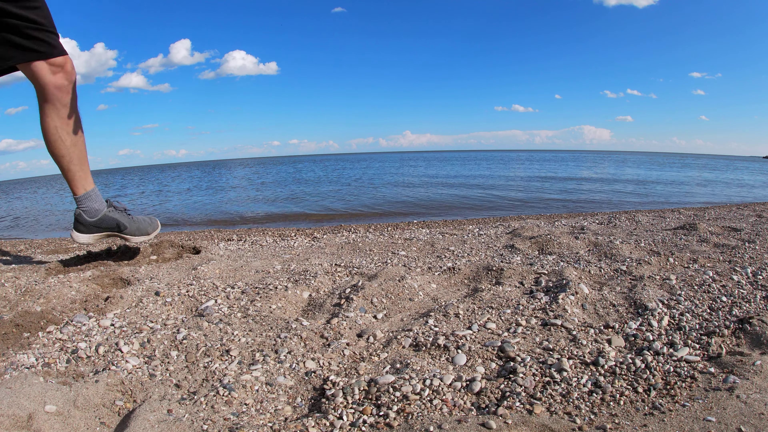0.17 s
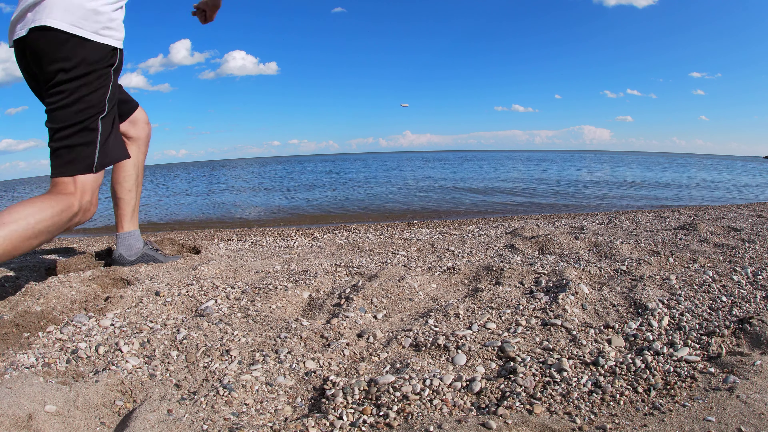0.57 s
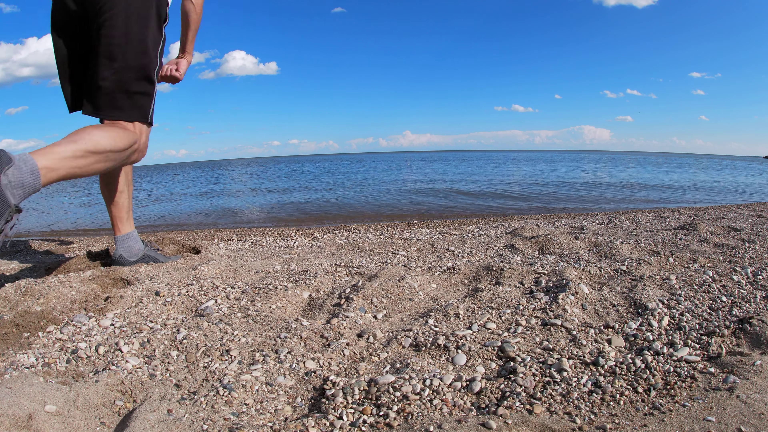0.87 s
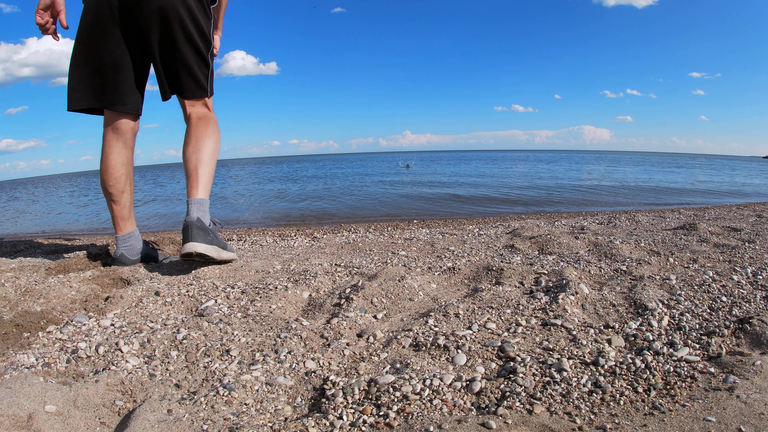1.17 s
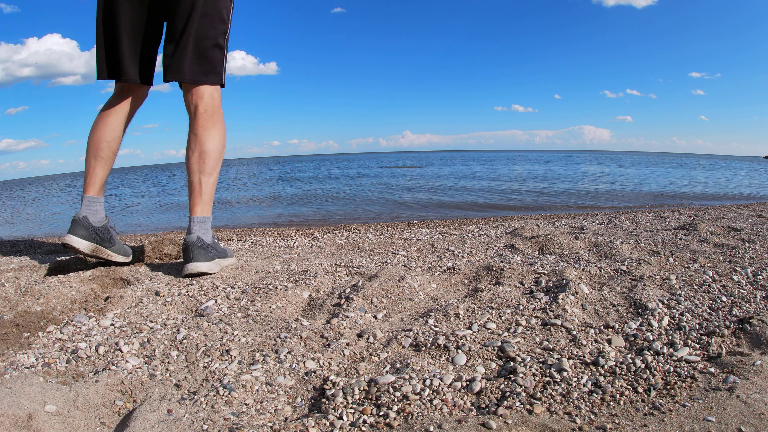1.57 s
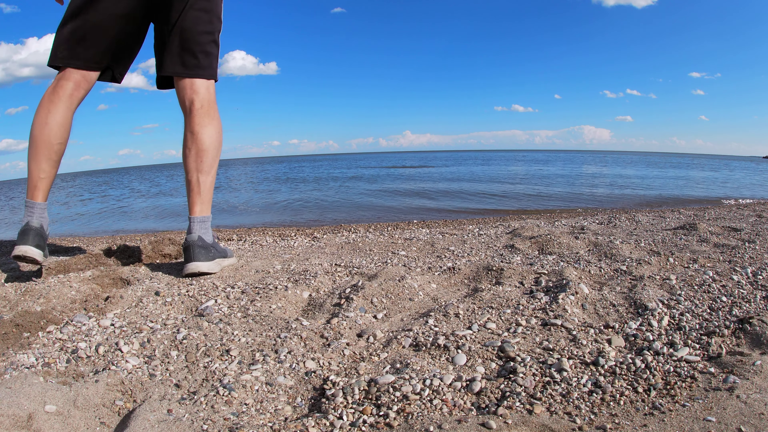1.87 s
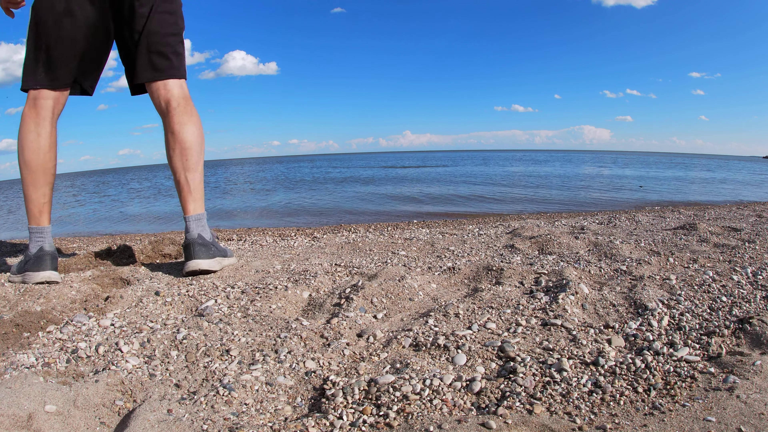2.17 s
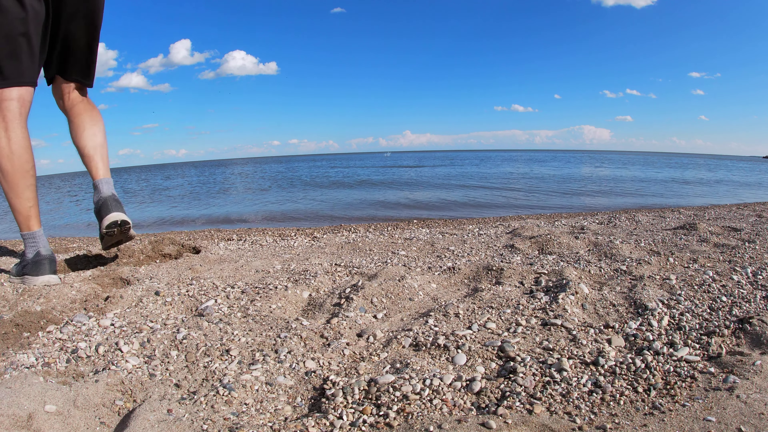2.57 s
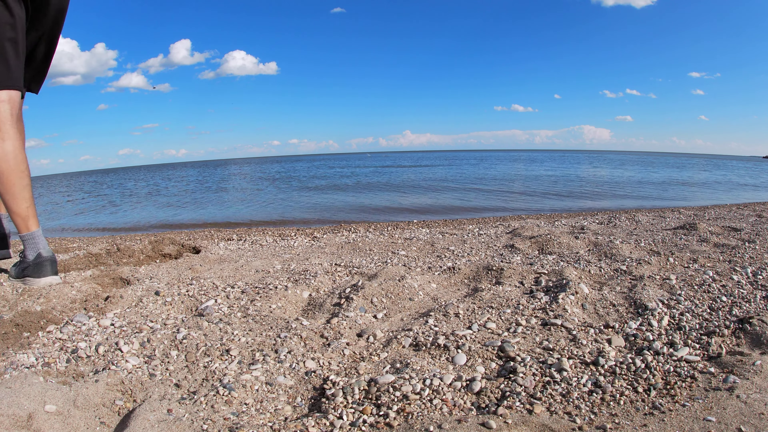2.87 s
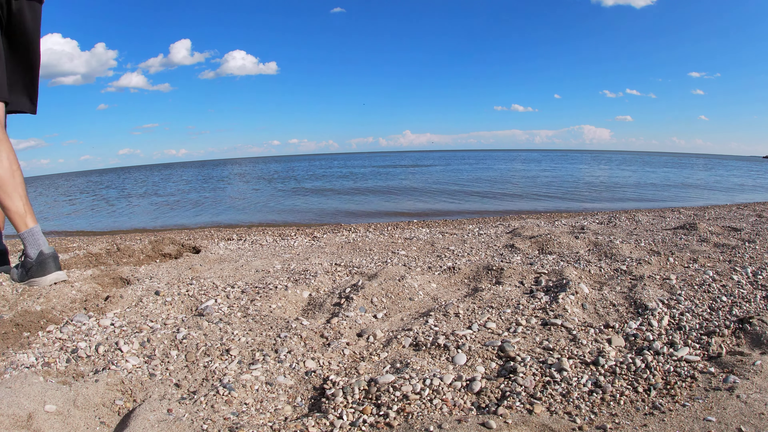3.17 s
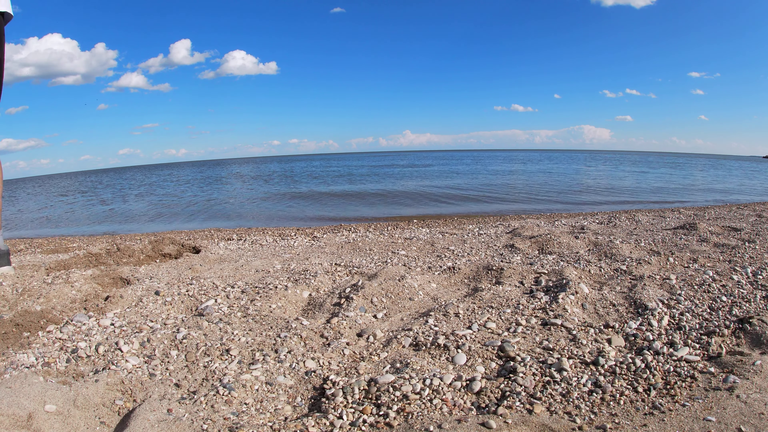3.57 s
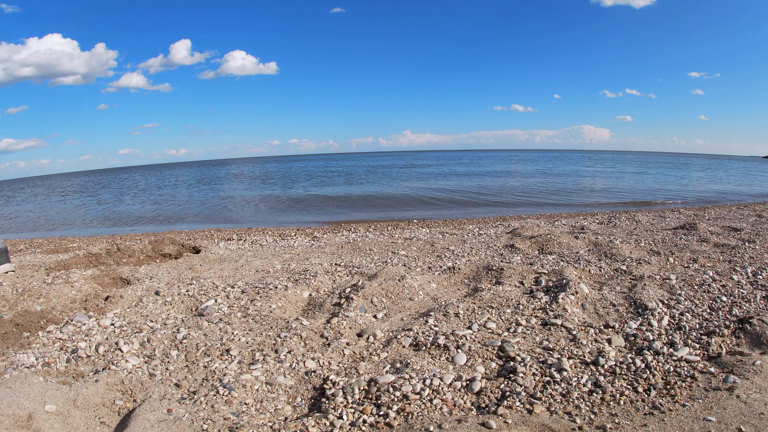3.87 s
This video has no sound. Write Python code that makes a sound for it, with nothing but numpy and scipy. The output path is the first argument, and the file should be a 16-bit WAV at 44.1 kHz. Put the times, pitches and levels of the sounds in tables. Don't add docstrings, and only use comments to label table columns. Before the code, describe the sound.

Shoes crunch close by on pebbles and shell grit, stones clicking; then strong gusts rumble and thump on a small ground-level microphone, and a small wave washes in near the end.

```python
import sys
import numpy as np
from scipy import signal
from scipy.fft import rfft, irfft, next_fast_len
from scipy.io import wavfile
from scipy.ndimage import uniform_filter1d, map_coordinates

SR = 44100
rng = np.random.default_rng(int(sys.argv[2]) if len(sys.argv) > 2 else 0)


def file_out(sig):
    cols = np.atleast_2d(sig).T
    lim = np.clip(cols, -1, 1)
    pcm = np.round(lim * 32767).astype(np.int16)
    wavfile.write(sys.argv[1], SR, pcm)


def linear_from_db(decibels):
    return 10 ** (np.asarray(decibels, float) / 20)


N = 176400

# time in seconds, strength in dB, air speed as a ratio.
WIND_COURSE = [(0, -46, 1.41), (.25, -64, 1.04), (.55, -44.5, 1.09), (.68, -27.5, 1.22), (.9, -47, 0.99),
               (1.35, -40, 1.26), (1.5, -19, 1.275), (1.72, -24, 1.234), (1.87, -24, 1.566),
               (1.99, -34.5, 1.07), (2.07, -21.5, 1.17), (2.3, -19, 2.7), (2.43, -24, 1.8),
               (2.52, -20.5, 2.03), (2.57, -35.5, 1.36), (3.2, -27.5, 1.68), (3.62, -36, 1.226),
               (4, -27.5, 1.18)]
# peak in seconds, level in dB, air speed as a ratio,
# half length in seconds.
WIND_BURSTS = [(0.664, -27.5, 1.2, 0.011), (0.684, -19, 1.83, 0.01715), (0.714, -24.5, 1.93, 0.01412),
               (0.802, -33, 1.25, 0.0078), (1.067, -32.5, 1.38, 0.0075), (1.209, -35, 1.3, 0.0085),
               (1.522, -17, 2.27, 0.01532), (1.583, -15, 3.29, 0.01107), (2.392, -19, 4.78, 0.005886),
               (1.65, -19, 3.21, 0.005004), (1.809, -24, 6.63, 0.00293), (1.853, -24, 3.59, 0.0058),
               (1.872, -21.5, 3.07, 0.0035), (1.921, -22.5, 3.95, 0.00669), (1.956, -24.5, 3.18, 0.00506),
               (2.025, -22, 2.59, 0.007084), (2.068, -19.5, 2.766, 0.007), (2.204, -16, 4.16, 0.012067),
               (2.231, -17.5, 6.2, 0.004495), (2.25, -10.5, 4.5, 0.00643), (2.278, -15, 4.87, 0.00597),
               (2.307, -13.5, 5.33, 0.00771), (2.361, -17.5, 2.6, .025), (2.47, -16, 3.29, 0.00766),
               (2.491, -16, 6.12, .012), (3.148, -22, 2.07, 0.01545), (3.21, -21, 1.96, 0.014),
               (3.246, -22, 2.6, 0.01462), (3.48, -19.5, 2.29, 0.014), (3.752, -20, 1.37, 0.019),
               (1.75, -22.5, 2.415, 0.0059), (1.785, -21, 2.89, 0.00988), (2.122, -24, 3.072, .01),
               (2.148, -20.5, 3.387, 0.0083), (2.327, -20, 4.54, 0.00673), (2.42, -20.5, 2.86, 0.0074),
               (2.515, -17.5, 3.01, 0.00805), (2.586, -33.5, 2.5, 0.01604), (2.742, -28.5, 2.25, 0.01212),
               (3.351, -26, 3.06, 0.00987), (3.601, -27.5, 2.43, 0.01496), (3.927, -28.5, 2, 0.021)]
# frequency in Hz, level in dB.
EDDY_COLOUR = [(12, -10.5), (25, -0.5), (50, -4.5), (85, -7), (130, -17.5), (200, -29.5), (350, -47),
               (900, -110)]
# peak in seconds, peak level in dB, pitch in Hz.
MEMBRANE_SNAPS = [(1.808, -18, 444), (1.879, -21, 258), (2.247, -5.5, 230), (2.286, -14.5, 360),
                  (2.308, -11, 400), (2.391, -22, 390), (2.488, -23.5, 590), (2.234, -18.5, 440),
                  (2.213, -12.5, 270), (.687, -13.5, 110), (2.471, -15.5, 235), (1.7, -17, 170),
                  (1.612, -10, 116), (2.352, -14.5, 160), (2.38, -19, 220), (1.812, -18.5, 157)]
# crest in seconds, level in dB, rise in seconds, drain in seconds.
WAVE_CRESTS = [
    (3.17, -37.5, 0.18, 0.19),
    (2.905, -52, 0.13, 0.13),
    (3.75, -48.5, 0.031, 0.021),
    (3.9, -51, 0.084, 0.068),
    (3.48, -43, 0.074, 0.05),
    (3.62, -51, 0.034, 0.071),
    (3.6, -55, 0.039, 0.017),
    (4.02, -38, 0.077, .1),
    (2.24, -48.5, 0.12, 0.35),
]
# frequency in Hz, level in dB.
WASH_COLOUR = [(150, -6.5), (350, 2.5), (700, -3), (1300, -16), (2400, -28.5), (5000, -40.5), (6300, -44),
               (8000, -66.5)]
# frequency in Hz, level in dB.
LAPPING_COLOUR = [(200, 2.5), (1250, -8.5), (3400, -15.5), (5050, -15), (5750, -12.5), (6900, -24.5),
                  (13000, -44), (14000, -61.5)]
# peak in seconds, peak level in dB, fall in seconds.
PEBBLE_SLIPS = [(0.028, -46.5, 0.0078), (0.068, -40.5, 0.0043), (0.087, -38, 0.0055), (0.12, -38.5, 0.0038),
                (0.145, -33, 0.0045), (0.156, -30, 0.0095), (0.219, -35, 0.0033), (0.237, -34, 0.0053),
                (0.318, -36, 0.0061), (0.361, -34, 0.0045), (0.442, -26, 0.0045), (0.464, -25.5, 0.005),
                (0.478, -28, 0.0081), (0.52, -33, 0.0047), (0.534, -33, 0.005), (0.58, -30, 0.0055),
                (0.622, -31, 0.0066), (0.654, -31, 0.0058), (3.031, -37, 0.0042), (3.076, -39.5, 0.005),
                (3.201, -34, 0.0079), (3.47, -42, 0.0052), (3.593, -51, 0.0037), (3.663, -53, 0.0027)]
# peak in seconds, level in dB, rise in seconds, fall in seconds, brightness
# in dB (each dB lifts the bright grit by 1 dB and lowers the dull grit by 2.54 dB).
SHOE_LOADS = [(0.162, -51, 0.041, 0.047, -2.5), (.1, -60.5, 0.018, 0.022, -3),
              (.24, -60, 0.059, 0.031, -0.5), (.3, -61, 0.19, 0.28, -1.5), (0.436, -44.5, 0.027, 0.021, 1),
              (.472, -38.5, 0.024, 0.024, .5), (0.532, -46, 0.032, 0.02, -2.5),
              (.6, -48.5, 0.047, 0.053, 2), (0.647, -45.5, 0.046, 0.023, -0.5),
              (0.694, -52.5, 0.051, 0.013, -1), (0.801, -52, 0.046, 0.1, 4), (0.87, -53, 0.028, 0.01, -1),
              (1.069, -41, 0.0031, 0.0068, 4.5), (1.3, -38, 0.0082, 0.014, 0.5),
              (1.4, -52.5, 0.12, 0.12, 5), (2.145, -66, 0.02, 0.057, 12), (2.222, -59, 0.023, .025, 9),
              (3.039, -62.5, 0.1, 0.047, -2.5), (3.24, -57.5, 0.041, 0.13, -4),
              (3.421, -51.5, 0.047, 0.046, 3.5), (3.979, -52, 0.044, 0.06, 1)]
# frequency in Hz, level in dB per Hz.
GRIT_COLOUR = [(90, -41.5), (160, -5.5), (620, -3), (1450, -9), (3000, -14.5), (6000, -20.5),
               (10500, -40.5), (15000, -67.5)]
# knock in seconds, peak level in dB, pitch in Hz, ring in cycles.
STONE_KNOCKS = [(0.088, -34, 2120, 0.94), (0.244, -40, 5030, 2.2), (0.358, -44, 1640, 2.7),
                (0.926, -43, 7550, 1.4), (0.9896, -43.5, 5736, 2), (1.0665, -23, 6500, 0.6),
                (1.2948, -42, 2007, 0.76), (1.4182, -40, 4200, 4.43), (1.4406, -45, 3434, 4),
                (1.468, -48.5, 2490, 8.8), (1.485, -44, 2740, 3), (1.494, -49.5, 3380, 8.2),
                (1.527, -51, 7543, 3.5), (1.545, -50, 4870, 5.1), (1.875, -50, 3774, 1.8),
                (1.9345, -58, 2918, 9.5), (1.98, -57, 5970, 2.7), (2.1001, -55, 4198, 3.1),
                (2.1221, -57, 4952, 1.285), (2.3615, -52.5, 5610, 2.5), (2.4354, -58, 5500, 4.8),
                (3.7811, -55, 3048, 1.27), (3.797, -43, 4940, 1), (3.855, -54, 4000, 5)]
# start in seconds, level in dB, first pitch in Hz, pitch rise in Hz per second,
# half length in seconds.
HOLLOW_GURGLE = (1.692, -53, 600, 12000, .011)
# peak in seconds, level in dB, rise in seconds, fall in seconds.
GRIT_SIFTS = [
    (1.62, -73.5, 0.57, 0.51),
    (2.159, -68, 0.047, 0.11),
]

LOW_CUT_HZ, MIC_HZ, HISS_DB = 22.6, 12900, -86
LAPPING_DB, FADE_DB_PER_S = -55.5, -2
DUCK_DB, DUCK_S, DUCK_SPAN_S = -6.5, 1.23, 0.25
RECOVER_DB_PER_S, RECOVER_S = 6, 2.6
GUARD_DB, GUARD_HZ, GUARD_S, GUARD_SPAN_S = -8, 6300, 2.4, 0.08
SLIP_DB, SLIP_RISE_S = -9, 0.00024
TIP_DB, TIP_RATIO = -25, 2.3


def unit(x):
    return x / np.sqrt(np.mean(x ** 2) + 1e-20)


def along(colour, hz):
    f, db = np.transpose(colour)
    return np.interp(np.log(hz + 1), np.log(f + 1), db)


def wobble(rate):
    return map_coordinates(rng.standard_normal(500), [np.arange(N) * rate / SR])


def swell(s, rise, fall):
    t = np.arange(N) / SR - s
    return np.where(t < 0, np.exp(-(t / rise) ** 2), np.exp(-np.abs(t / fall) ** 1.109))


def filtered(x, gain):
    m = next_fast_len(N + 8192)
    spectrum = rfft(np.pad(x, 4000, mode="reflect"), m)
    return irfft(spectrum * gain(np.fft.rfftfreq(m, 1 / SR)), m)[4000:N + 4000]


def rush(colour, patchy_db, tilt_db=0, spiky_db=0):
    grain = np.minimum(rng.exponential(size=N // 8 + 1), 4).repeat(8)[:N]
    hail = rng.standard_normal(N) * linear_from_db(spiky_db * grain)
    z = signal.stft(hail, nperseg=512)[2]
    patches = uniform_filter1d(rng.standard_normal(z.shape), size=6, axis=0)
    patches = uniform_filter1d(patches, size=8, axis=1)
    x = signal.istft(z * linear_from_db(patchy_db * unit(patches)), nperseg=512)[1][:N]
    return unit(filtered(x, lambda hz: linear_from_db(along(colour, hz) + tilt_db * np.log2(hz / 2000 + 0.0033))))


def eddies(speed):
    row = rush(EDDY_COLOUR, patchy_db=2.5)
    power = uniform_filter1d(uniform_filter1d(row ** 2, size=700, mode="wrap"), size=400)
    row = row / (np.sqrt(np.abs(power)) + 0.3)
    row = unit(filtered(row, lambda hz: 1 / (1 + (hz / 260) ** 4)))
    return map_coordinates(row, [np.cumsum(speed)], order=3, mode="mirror")


def wind():
    s, db, ratio = np.transpose(WIND_COURSE)
    t = np.arange(N) / SR
    strength_db, speed = np.interp(t, s, db), np.interp(t, s, ratio)
    lump = np.tanh(0.5994 * wobble(24))
    power = linear_from_db(2 * (strength_db + 4 * lump + 2.29 * np.tanh(0.6 * wobble(8))))
    flow = power * speed * np.exp(0.3012 * lump + 0.3 * np.maximum(wobble(70), 0))
    for s, db, ratio, half in WIND_BURSTS:
        burst = linear_from_db(2 * db) * swell(s, half, half) ** 2
        power = power + burst
        flow = flow + burst * ratio
    speed = uniform_filter1d(flow / power, size=60)
    return np.sqrt(power) * (0.72 * eddies(speed) + 0.88 * eddies(0.8 * np.sqrt(speed)))


def water():
    t = np.arange(N) / SR
    wash = sum(linear_from_db(db) * swell(s, rise, drain) for s, db, rise, drain in WAVE_CRESTS)
    wash = wash * linear_from_db(0.44 * np.tanh(wobble(13)) + 0.46 * wobble(50))
    duck_db = DUCK_DB / (1 + np.exp((DUCK_S - t) / DUCK_SPAN_S))
    recovery_db = RECOVER_DB_PER_S * np.maximum(t - RECOVER_S, 0)
    lapping_db = LAPPING_DB + FADE_DB_PER_S * t + duck_db + recovery_db + 1.1 * wobble(13)
    near = wash * rush(WASH_COLOUR, patchy_db=3.0, spiky_db=3.5)
    return near + linear_from_db(lapping_db) * rush(LAPPING_COLOUR, patchy_db=2.5, spiky_db=2.5)


def slips():
    grit = rush(GRIT_COLOUR, patchy_db=1.5, tilt_db=-3.0, spiky_db=2.0)
    grit = grit / np.sqrt(np.abs(uniform_filter1d(grit ** 2, size=130)) + 0.058)
    cracks = sum(linear_from_db(db + SLIP_DB) * swell(s + SLIP_RISE_S, SLIP_RISE_S, fall) for s, db, fall in PEBBLE_SLIPS)
    return cracks * grit


def stones():
    out, t = np.zeros(N + 900), np.arange(800) / SR
    trickle = [(1.6 + s * s, -62 - 6 * s - 3 * np.log(1.02 - a), 3200 * np.exp(1.1 * b), 1.8 + 3 * c)
               for s, a, b, c in rng.uniform(size=(160, 4))]
    for s, db, hz, cycles in list(STONE_KNOCKS) + trickle:
        ring = np.exp(-t * hz / cycles) * (1 - np.exp(-t * hz * 2.5)) * np.sin(2 * np.pi * hz * t)
        out[round(s * SR):][:800] += linear_from_db(db + 2.0) * ring
    s, db, hz, rise, half = HOLLOW_GURGLE
    t = np.arange(N) / SR - s
    gurgle = np.sin(2 * np.pi * (hz * t + rise * t * t / 2))
    return out[:N] + linear_from_db(db) * swell(s + half, half, half) * gurgle


def steps():
    dull = rush(GRIT_COLOUR, patchy_db=1.74, tilt_db=-2.0, spiky_db=1.5)
    bright = rush(GRIT_COLOUR, patchy_db=2.5, tilt_db=3.5, spiky_db=3.5)
    out = np.zeros(N)
    for s, db, rise, fall, tilt_db in SHOE_LOADS:
        grit = linear_from_db(4 - 2.54 * tilt_db) * dull + linear_from_db(tilt_db - 8.5) * bright
        out += linear_from_db(db) * swell(s, rise, fall) * grit
    return out * linear_from_db(2.2 * np.tanh(0.47 * wobble(80)))


def snaps():
    def suck(u):
        return (2 * u ** 2 - 1) * np.exp(-u ** 2)

    out = np.zeros(N)
    for s, db, hz in MEMBRANE_SNAPS:
        u = np.pi * hz * (np.arange(N) / SR - s)
        out += linear_from_db(db) * (suck(u) + linear_from_db(TIP_DB) * suck(TIP_RATIO * u))
    return out


def sifting():
    slide = sum(linear_from_db(db) * swell(s, rise, fall) for s, db, rise, fall in GRIT_SIFTS)
    return slide * rush(GRIT_COLOUR, patchy_db=-0.5, tilt_db=16, spiky_db=4.0)


def scene():
    air = filtered(wind(), lambda hz: 1 / np.sqrt(1 + (LOW_CUT_HZ / (hz + 1)) ** 4))
    far = filtered(water() + stones() + sifting(), lambda hz: np.where(hz < MIC_HZ, 1, 0.12))
    return (air + far + slips() + steps() + snaps())[None]


def band_limit(x):
    return signal.sosfilt(signal.butter(12, 15130, fs=SR, output="sos"), x)


def record(dry):
    t = np.arange(N) / SR
    treble = filtered(dry[0], lambda hz: 1 / (1 + (GUARD_HZ / (hz + 1)) ** 20))
    trim_db = GUARD_DB / (1 + np.exp((GUARD_S - t) / GUARD_SPAN_S))
    trim_db = trim_db * (1 - 0.6 * swell(4, 0.06, 1))
    hiss = filtered(rng.standard_normal(N), lambda hz: hz < MIC_HZ)
    hiss = linear_from_db(HISS_DB + 2.1 * wobble(49)) * hiss
    mix = dry + (linear_from_db(trim_db) - 1) * treble + hiss
    mix = mix / (1 + (mix / 0.75) ** 4) ** 0.25
    return band_limit(mix)


dry = scene()
out = record(dry)
file_out(out)
```